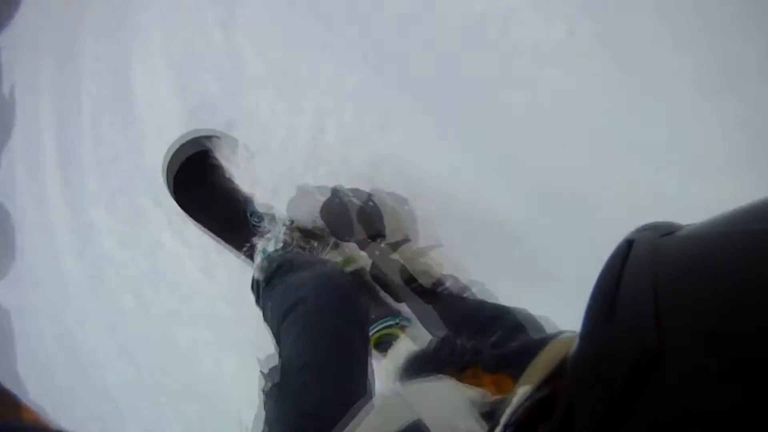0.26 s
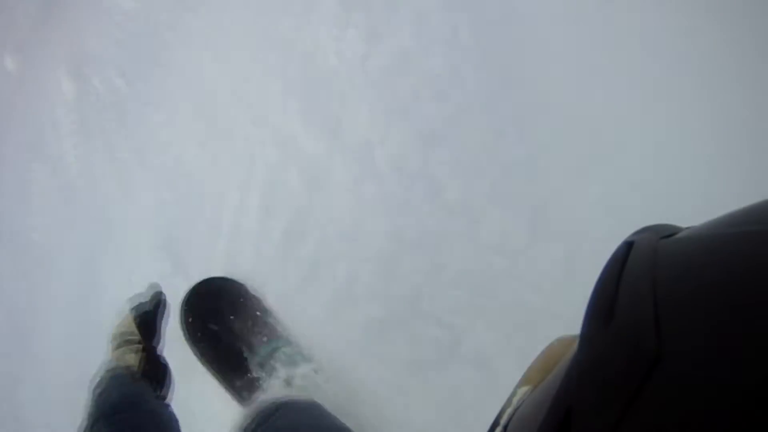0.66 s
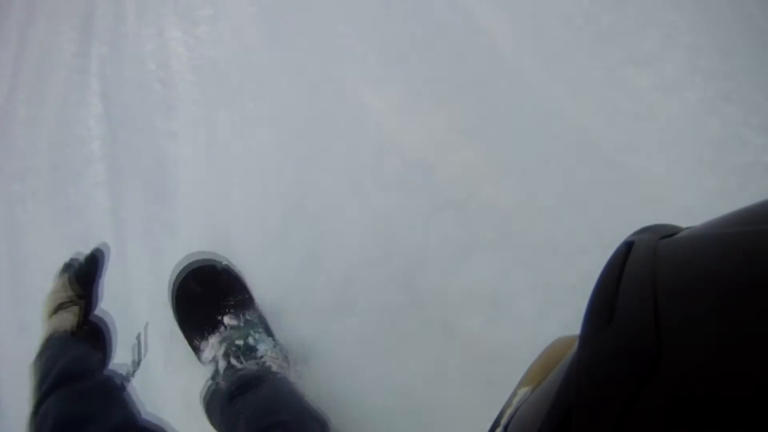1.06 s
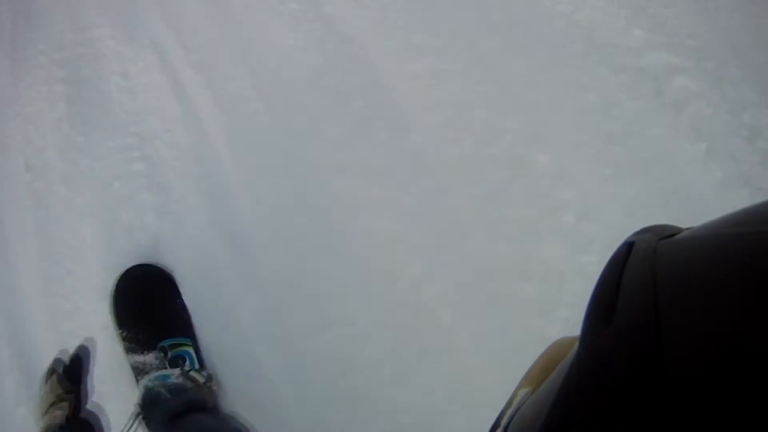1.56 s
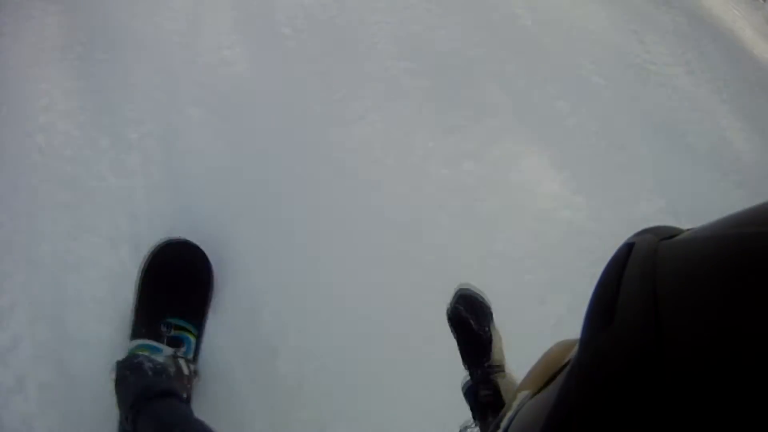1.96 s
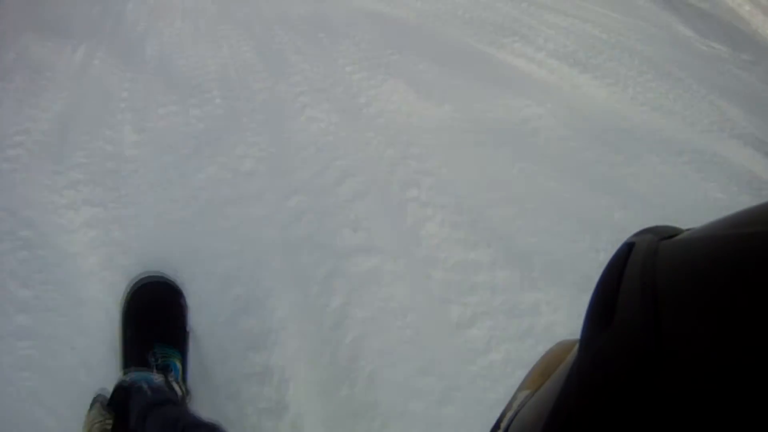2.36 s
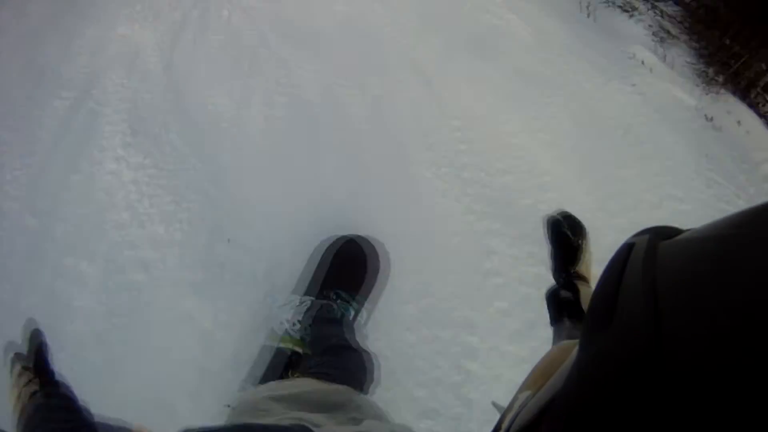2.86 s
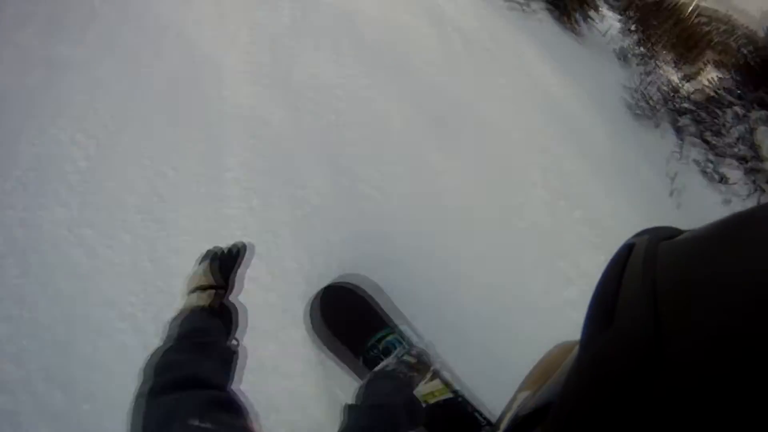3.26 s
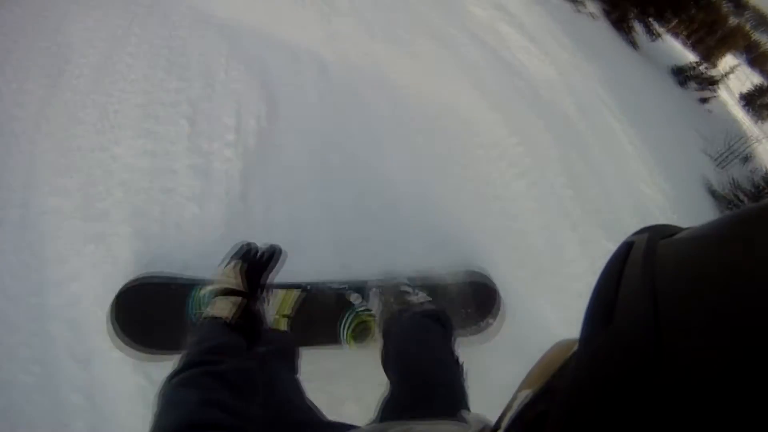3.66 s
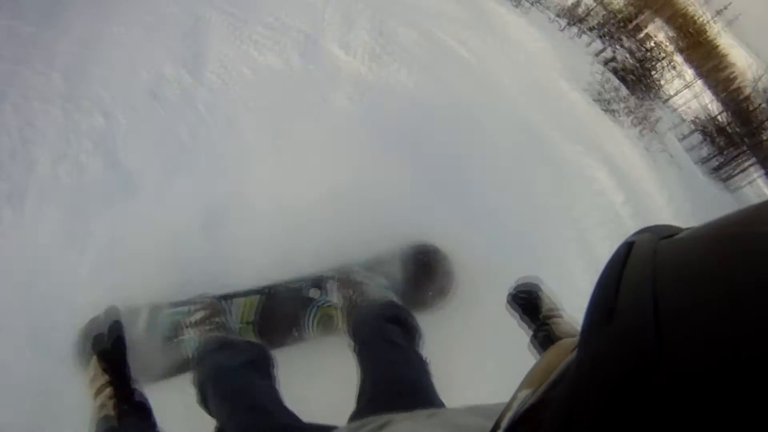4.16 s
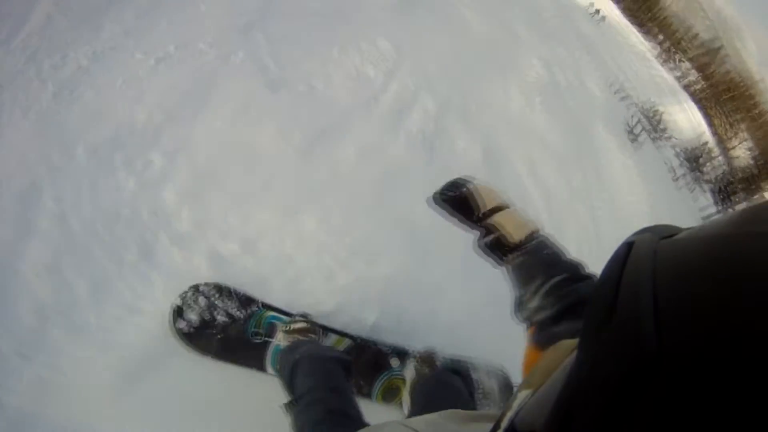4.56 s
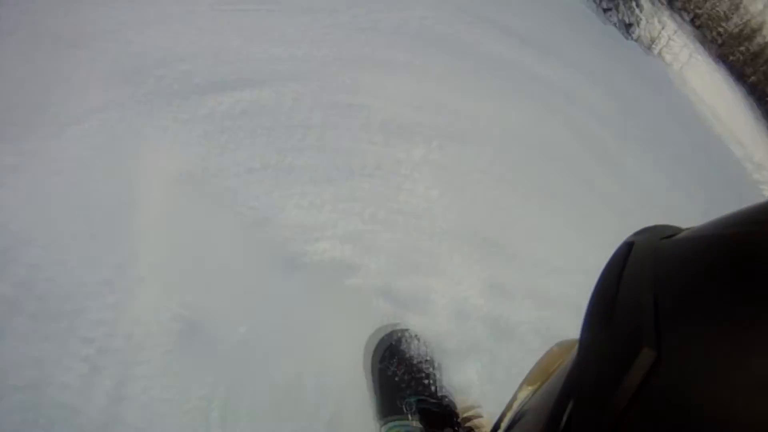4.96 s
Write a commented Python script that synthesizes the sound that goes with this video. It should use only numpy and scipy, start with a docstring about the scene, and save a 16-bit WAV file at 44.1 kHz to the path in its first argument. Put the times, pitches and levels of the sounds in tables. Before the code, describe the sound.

A snowboard scrapes and hisses over packed snow in buffeting low wind, after an opening burst of spray that overloads the microphone.

```python
"""A snowboard scrapes over packed snow in buffeting wind, heard from a small camera worn by the rider. At once
a burst of spray overloads the microphone; crumbs of ice tick on the case throughout, and now and then a sharp
tap clicks on it. Snow, wind and rumble are filtered noise; bumps, ice and the singing edge excite resonances.
The camera adds faint electrical buzz and burrs, and a glassy treble from coarse sampling."""
import sys
import numpy as np
from scipy import signal
from scipy.fft import rfft, irfft
from scipy.io import wavfile
from scipy.ndimage import uniform_filter1d

SR = 44100
rng = np.random.default_rng(int(sys.argv[2]) if len(sys.argv) > 2 else 0)


def wrap_up_sound(samples):
    """Save the sound to the file named by the first command line argument, as 16-bit audio."""
    columns = np.atleast_2d(samples).T
    # keep every value between -1 and 1, then stretch to whole-number steps
    tamed = np.clip(columns, -1, 1)
    steps = np.round(tamed * 32767).astype(np.int16)
    wavfile.write(sys.argv[1], SR, steps)


N = 229663
TIME = np.arange(N) / SR
USUAL_SCRAPE_DB = -34

# How far the board is turned sideways. Each row: time in seconds, skid share 0-1.
SKID_SHARE = [(0, 0.7), (1.4, 0), (1.75, 0.86), (2.3, 0.36), (2.8, 0), (3.15, 0.78), (3.8, 0.74), (4.3, 0),
              (4.7, 1), (5.21, 1)]


def amp(db):
    """Decibels to gain."""
    return 10 ** (np.asarray(db) / 20)


def unit(x):
    """Scales to rms 1."""
    return x / np.sqrt(np.mean(x ** 2) + 1e-20)


def curve(rows):
    """Joins rows (seconds, value) by straight lines."""
    return np.interp(TIME, *np.transpose(rows))


def add(mix, start_s, sound):
    """Mixes a sound in place, cut at the end of the mix."""
    part = mix[max(round(start_s * SR), 0):][:len(sound)]
    part += sound[:len(part)]


def swell(middle_s, length_s):
    """A smooth rise and fall of height 1."""
    return np.cos(np.pi * np.clip((TIME - middle_s) / length_s, -.5, .5)) ** 2


def wander(rate_hz):
    """Smooth random curve of rms 1 that changes about rate_hz times a second."""
    width = max(int(SR / rate_hz), 1)
    smooth = uniform_filter1d(rng.standard_normal(N), width, mode="wrap")
    return unit(uniform_filter1d(smooth, width // 2 + 1, mode="wrap"))


def coloured(x, colour):
    """Filters by a spectrum of (Hz, dB) rows, joined over log frequency; rms 1."""
    hz, db = np.transpose(colour)
    bins_hz = np.fft.rfftfreq(2 ** 18, 1 / SR)
    gain = amp(np.interp(np.log(bins_hz + 1), np.log(hz), db))
    return unit(irfft(rfft(x, 2 * len(bins_hz) - 2) * gain)[:N])


def resonate(x, hz, width_hz):
    """A resonance of gain 1 at a fixed or moving pitch: shift down to zero, smooth, shift back."""
    turn = np.exp(2j * np.pi * np.cumsum(hz * np.ones(len(x))) / SR)
    r = np.exp(-np.pi * width_hz / SR)
    smooth = signal.lfilter([(1 - r) ** 2], [1, -2 * r, r * r], x / turn)
    return 2 * (turn * smooth).real


def struck(modes, t):
    """Dying modes, neighbours of opposite sign, detuned a little for each blow; peak 1."""
    ring = np.zeros(len(t))
    for k, (hz, db, t60_s) in enumerate(modes):
        detuned_hz = hz * (1 + 0.013 * rng.standard_normal())
        ring += (-1) ** k * amp(db - 60 * t / t60_s) * np.sin(2 * np.pi * detuned_hz * t)
    return ring / abs(ring).max()


def spike(since_s, rise_s, fall_s):
    """An electrical spike: two exponentials subtracted; points down if rise_s exceeds fall_s."""
    return np.exp(-since_s / fall_s) - np.exp(-since_s / rise_s)


def crunch(per_s, spread_db, smooth):
    """Snow grains break one by one, a few of them large, over a smooth hiss of powder."""
    sizes = amp(spread_db * np.minimum(rng.exponential(1, N), 5))
    breaks = rng.random(N) < per_s / SR
    grains = rng.choice([-1, 1], N) * sizes * breaks
    return unit(grains) + smooth * rng.standard_normal(N)


def patchy(x, depth_db, order=5):
    """Patches of harder and softer snow lift and sink parts of the spectrum for hundredths of a second."""
    z = signal.stft(x, nperseg=512, noverlap=384)[2]
    across_hz = uniform_filter1d(rng.standard_normal(z.shape), order, axis=0)
    patches = unit(uniform_filter1d(across_hz, 2 * order, axis=1))
    return unit(signal.istft(z * amp(depth_db * patches), nperseg=512, noverlap=384)[1][:N])


def scrape_db():
    """Level of the scrape: the rider's weight on the board, and brief bites of the edge."""
    # How hard the base presses on the snow. Each row: time in seconds, level in dB.
    press = [(0, -40.5), (.11, -24), (.23, -44), (.29, -28.5), (.82, -35.5), (1.35, -33.5), (1.7, -40),
             (1.94, -45.5), (2.22, -41.5), (2.5, -38), (2.7, -35), (2.92, -36.5), (3.15, -32.5),
             (4.12, -52.5), (4.59, -55), (4.67, -39), (5.06, -33.5), (5.21, -50)]
    # The edge digs in. Each row: middle in seconds, extra level in dB.
    bites = [(1.3, 1.5), (1.41, 3.5), (1.61, 3), (1.75, 6), (2.058, 7), (3.79, 3.5)]
    bite_s = 0.0774
    return curve(press) + sum(db * swell(s, bite_s) for s, db in bites)


def fizz_db():
    """The fizz grows with the scrape, fades as the board turns sideways and drops past the icy patch."""
    usual_fizz_db, db_per_scrape_db, full_skid_db = -44.5, 0.402, -7.5
    crust_end_s, crust_fade_s, soft_snow_db = 1.355, 0.083, -4
    soft = np.clip((TIME - crust_end_s) / crust_fade_s, 0, 1)
    follow_db = db_per_scrape_db * (scrape_db() - USUAL_SCRAPE_DB)
    return usual_fizz_db + follow_db + full_skid_db * curve(SKID_SHARE) ** 3 + soft_snow_db * soft


def wind_db():
    """Level of the wind: the steady stream and its gusts."""
    # Steady air on the housing. Each row: time in seconds, level in dB.
    stream = [(0, -22.5), (.35, -23), (.8, -28), (1.75, -31), (2.25, -34.5), (2.7, -31), (2.95, -33),
              (3.17, -23), (3.46, -31.5), (3.9, -25.5), (4.22, -40), (4.75, -32), (5.21, -37.5)]
    # Each row: middle in seconds, length in seconds, extra level in dB.
    gusts = [(1.333, 0.23, 10.5), (2.423, 0.073, 3.5), (3.34, 0.175, 10.5), (3.573, 0.098, 5),
             (3.883, 0.095, 3.5)]
    return curve(stream) + sum(db * swell(s, length_s) for s, length_s, db in gusts)


def buzz(frame_hz=59.94):
    """The camera's electronics leak in: a spike up and one down on every picture frame, and a faint whine."""
    up = amp(-28.5) * spike((TIME - .0014) % (1 / frame_hz), rise_s=0.000138, fall_s=0.000626)
    down = amp(-23) * spike((TIME - .004) % (1 / frame_hz), rise_s=0.00044, fall_s=0.00121)
    whine = amp(-60.5) * unit(resonate(rng.standard_normal(N), hz=2672.0, width_hz=170))
    return up - down - np.mean(up - down) + whine


def burrs(pitch_hz=328, jitter=0.035):
    """Electrical burrs of a few uneven spikes, one due every one to three ticks of a steady clock."""
    first_s, tick_s, share_per_tick = .036, .05, .58
    level_db, spread_db = -37, 1.2
    out, t, due = np.zeros(N), np.arange(int(0.018 * SR)) / SR, 0
    for s in np.arange(first_s, N / SR, tick_s):
        due = due % 1 + share_per_tick * rng.uniform(.6, 1.4)
        period_s = 1 / (pitch_hz * rng.uniform(0.9513, 1.04))
        starts_s = period_s * (np.arange(8) + jitter * rng.standard_normal(8))
        since_s = np.maximum(t[:, None] - starts_s, 0)
        train = spike(since_s, rise_s=0.000328, fall_s=0.000257).sum(axis=1)
        train = (train - train.mean()) / train.std()
        gain = amp(level_db + spread_db * rng.standard_normal()) * (due >= 1)
        add(out, s - t[-1] / 2, gain * train * signal.windows.tukey(len(t), .6))
    return out


def wind():
    """Eddies push slowly on the housing: low noise, evened out, then driven by the wind level."""
    # Each row: frequency in Hz, gain in dB.
    wind_colour = [(8, -18.5), (22, -2), (40, 2), (55, -6), (75, -19), (120, -18), (200, -41), (400, -71.5),
                   (1000, -59.5)]
    flutter_db = 3
    eddies = coloured(rng.standard_normal(N), wind_colour)
    strength = np.sqrt(abs(uniform_filter1d(eddies ** 2, int(.09 * SR))) + 0.065)
    return eddies / strength * amp(wind_db() + flutter_db * wander(rate_hz=18.7) + 1.5)


def burst(start_s, end_s):
    """Snow lands at once, holds and stops dead."""
    attack_s, release_db_per_s = 0.0012, 3397.5
    attack = np.clip((TIME - start_s) / attack_s, 0, 1)
    return attack * amp(-release_db_per_s * np.maximum(TIME - end_s, 0))


def spray():
    """Fine dust builds up, then clumps of snow rattle on the housing and its ring turns from dull to bright."""
    # Each row: frequency in Hz, gain in dB.
    spray_colour = [(40, 8), (110, 2.5), (200, -4.5), (380, -4.5), (600, -16), (1000, -1.5), (1400, 1.5),
                    (2000, -1), (2500, -0.5), (2900, -5), (3600, -10), (4300, -3), (6000, -26)]
    # Heavy clumps. Each row: start in seconds, length in seconds, level in dB.
    heavy = [(0.1305, 0.0055, 3.5), (0.145, 0.0134, 6.5), (0.159, 0.0255, -1.5), (0.189, 0.00544, -6.5)]
    dust_start_s, dust_end_s = 0.069, 0.138
    dust_end_db, dust_rise_db_per_s = -9, 317.5
    dust_db = dust_end_db - dust_rise_db_per_s * np.maximum(dust_end_s - TIME, 0)
    dust = amp(dust_db) * burst(dust_start_s, dust_end_s)
    clumps = sum(amp(db) * burst(s, s + length_s) for s, length_s, db in heavy)
    grains = crunch(per_s=1500, spread_db=2.0, smooth=0.536) * amp(1.1 * wander(rate_hz=460))
    bright = np.interp(TIME, [.15, .175], [0, 1])
    dull_ring = amp(-10.5) * unit(resonate(grains, hz=2071, width_hz=610))
    bright_ring = amp(-6.5) * unit(resonate(grains, hz=3515.0, width_hz=327))
    rattle = patchy(coloured(grains, spray_colour), depth_db=4.0)
    return (rattle + (1 - bright) * dull_ring + bright * bright_ring) * np.maximum(dust, clumps)


def taps():
    """A sharp tap gives one hard click on the case."""
    # Each row: start in seconds, peak level in dB.
    hits = [(0.017, -27), (.038, -29), (.06, -17), (0.094, -4.5), (.234, -25.5), (0.2792, -9.5),
            (.33, -15.5), (.545, -13.5), (1.282, -19), (1.2997, -16.5), (1.4073, -11.5), (3.379, -21.5),
            (3.707, -22), (3.763, -26), (3.809, -25.5)]
    # Ring of the case. Each row: frequency in Hz, relative level in dB, t60 in seconds.
    case_modes = [(1507, 7.5, 0.0124), (1858, 2.5, 0.0453), (2229, 11, 0.008), (3620, 1.5, 0.0061),
                  (4570, -0.5, 0.00284)]
    out, t = np.zeros(N), np.arange(SR // 20) / SR
    for s, db in hits:
        add(out, s, amp(db) * struck(case_modes, t))
    return out


def crumb(db, ring_hz, crumbling_s):
    """A crumb shatters on the case in a few milliseconds and rings it."""
    body_db = -2  # against the ring
    t = np.arange(SR // 20) / SR
    age = t / max(crumbling_s, .0003)
    shatter = rng.laplace(size=len(t)) * np.sqrt(age) * np.exp(-1.3 * age)
    ring = resonate(shatter, ring_hz, width_hz=1060.0)
    ring = ring + amp(-5.5) * resonate(shatter, hz=4872, width_hz=580.0)
    body = resonate(shatter, hz=1946, width_hz=1550)
    return amp(db - 17.0) * (unit(ring) + amp(body_db) * unit(body))


def crumbs(count=60):
    """Large crumbs of ice, among random small ones: more with a harder scrape, as strong as the fizz."""
    # Each row: start in seconds, nominal peak in dB, ring in Hz, crumbling time in seconds.
    large = [(.315, -26.5, 3700, .0035), (0.3643, -25, 4720, 0.00256), (.4925, -24.5, 3810, 0.0048),
             (.6193, -22.5, 3610, 0.0062), (.775, -25.5, 3310, 0.002), (.9979, -31, 3655, 0.0034),
             (1.3578, -28, 3380, 0.0027), (1.393, -18.5, 3670, 0.0045), (1.4357, -21, 3600, 0.0044),
             (1.742, -34.5, 3740, .004), (1.7842, -32.5, 3280, 0.0022), (1.9505, -29.5, 3320, 0.00197),
             (2.083, -35.5, 3530, 0.0038), (2.1072, -36.5, 4980, 0.0021), (2.1894, -28.5, 4800, 0.00254),
             (2.2544, -29.5, 4190, 0.004), (2.443, -36, 3650, 0.0036), (2.656, -28, 4900, .0025),
             (2.8148, -32.5, 5300, 0.0026), (2.8742, -36, 3680, 0.0019), (2.9616, -24.5, 3660, 0.0094),
             (2.9911, -29, 4090, 0.0065), (3.1705, -33.5, 3530, 0.0035), (3.2472, -29.5, 3600, 0.00173),
             (3.2733, -28, 3460, 0.00166), (3.5561, -36.5, 3470, .0024), (3.829, -32.5, 4880, 0.00164),
             (3.8914, -33.5, 3700, 0.00375), (4.6912, -28.5, 3520, 0.0029)]
    usual_per_s, over_fizz_db, spread_db = 7.7, 9.5, -0.5
    small_hz, small_crumbling_s = 3740, 0.0024
    out, edge_db = np.zeros(N), fizz_db()
    per_s = usual_per_s * np.sqrt(amp(scrape_db() - USUAL_SCRAPE_DB))
    for s, db, ring_hz, crumbling_s in large:
        add(out, s, crumb(db, ring_hz, crumbling_s))
    for place, chance, size, tone in rng.random((count, 4)):
        i = int(place * N)
        db = edge_db[i] + over_fizz_db + spread_db * (2 * size - 1)
        small = crumb(db, small_hz * (1 + 0.467 * (tone - .5)), small_crumbling_s)
        flies = chance < per_s[i] * N / SR / count
        add(out, place * N / SR, small * flies)
    return out


def knocks():
    """Each bump gives a low thud, the deeper the longer, and a short hollow clack."""
    # Each row: start in seconds, thud level before decay in dB, thud in Hz, clack peak in dB.
    bumps = [(0.095, -3, 25.1, -9.5), (0.132, 4.5, 90.9, -28.5), (0.271, -13, 105.4, -7.5),
             (0.543, -34.5, 120, -14.5), (0.615, -13.5, 90.3, -16), (2.278, -4, 230, -10.5),
             (3.088, -10, 159, -42.5), (3.255, -14, 115, -37.5), (3.339, -3.5, 45.7, -2.5),
             (3.378, -26, 90, -17.5), (3.445, -42.5, 120, -18.5), (3.707, -24.5, 97.6, -28)]
    # Ring of board and housing. Each row: frequency in Hz, relative level in dB, t60 in seconds.
    clack_modes = [(191, 4, 0.0173), (344, -6, 0.0054), (632.7, -10.5, 0.0362), (1016, -1, 0.0317),
                   (1224.5, 1.5, 0.0119), (1721, -7.5, 0.017), (2215, -7, 0.0105), (3450, -21.5, 0.012)]
    thud_rise_s, thud_cycles = 0.00081, 7.85  # swings until 60 dB down
    out, t = np.zeros(N), np.arange(SR // 4) / SR
    for s, thud_db, thud_hz, clack_db in bumps:
        decay = amp(thud_db - 60 * t * thud_hz / thud_cycles)
        thud = -decay * np.sin(2 * np.pi * thud_hz * t) * (1 - np.exp(-t / thud_rise_s))
        ring = struck(clack_modes, t) * (1 - np.exp(-t / 0.00063))  # snow cushions the blow
        add(out, s, thud + amp(clack_db) * ring / abs(ring).max())
    return out


def chirps():
    """The edge bites and the board sings: stick and slip, as noise, feeds one narrow gliding resonance."""
    # Each row: start in seconds, length in seconds, start pitch in Hz, end pitch in Hz, level in dB.
    songs = [(1.28, 0.0857, 1034, 1076, -34.5), (1.562, 0.1115, 1067, 1134, -39.5),
             (1.711, 0.065, 1210, 1188, -36), (2.172, 0.054, 1077, 1143, -37.5),
             (3.105, 0.0667, 1577, 1690, -34.5), (3.196, 0.0352, 1620, 1580, -33.5),
             (3.485, 0.107, 1736, 1612, -40), (3.785, 0.032, 1988, 1790, -40.5),
             (4.791, 0.159, 1663, 1604, -40.5), (4.917, 0.335, 1069, 1130, -40),
             (4.941, 0.209, 2132, 1846, -38.5)]
    out = np.zeros(N)
    for s, length_s, start_hz, end_hz, db in songs:
        hz = np.linspace(start_hz, end_hz, int(length_s * SR))
        song = unit(resonate(rng.standard_normal(len(hz)), hz, width_hz=148.0))
        add(out, s, amp(db) * song * signal.windows.tukey(len(hz), .7))
    return out


def board():
    """Crunching snow shakes the board: glide blends into skid, the edge fizzes on crust, the board rumbles."""
    # Spectra of the four sounds. Each row: frequency in Hz, gain in dB.
    glide_colour = [(300, -16), (550, -14.5), (780, -13), (1000, -2.5), (1180, -4), (1550, -0.5),
                    (1850, -5), (2250, -1.5), (2600, -7), (3000, -14.5), (3600, -12), (4050, -30),
                    (6000, -60.5)]
    skid_colour = [(300, -8), (480, -10.5), (620, -4), (760, -7.5), (1100, -1), (1360, -5), (1620, -2.5),
                   (1850, -3.5), (2150, -4), (2500, -14.5), (3000, -26), (6000, -49)]
    fizz_colour = [(2000, -5), (3000, -11), (3350, -3), (3650, 5.5), (4000, -4.5), (4500, -6.5), (5000, -5),
                   (5500, -8), (6000, -27.5)]
    rumble_colour = [(40, 2.5), (90, 2.5), (160, -0.5), (250, 1.5), (400, -15.5), (700, -16.5), (1200, -20),
                     (3000, -32.5)]
    usual_rumble_db, usual_wind_db = -38.5, -30
    rumble_per_scrape, rumble_per_wind = 0.195, 0.418  # dB per dB
    skid = np.clip(curve(SKID_SHARE), 0, 1)
    grip = wander(rate_hz=47)  # the edge catches and lets go
    pressure_db = scrape_db() + 0.11 * wander(rate_hz=27)  # the snow is uneven

    glide = coloured(crunch(per_s=1100, spread_db=3.0, smooth=1.0), glide_colour)
    slide = coloured(crunch(per_s=1800, spread_db=2.0, smooth=0.9), skid_colour)
    scrape = patchy(np.sqrt(1 - skid) * glide + np.sqrt(skid) * slide, depth_db=1.6)
    scrape = scrape * amp(pressure_db + 1.02 * grip)

    fizz = patchy(coloured(crunch(per_s=580, spread_db=1.5, smooth=1.0), fizz_colour), depth_db=2.37)
    fizz = fizz * amp(fizz_db() + 0.68 * grip)

    rumble_db = usual_rumble_db + rumble_per_scrape * (pressure_db - USUAL_SCRAPE_DB)
    rumble_db = rumble_db + rumble_per_wind * (wind_db() - usual_wind_db)
    rumble = coloured(rng.standard_normal(N), rumble_colour) * amp(rumble_db + 3.05 * wander(rate_hz=44))
    return scrape + fizz + rumble


def scene():
    """Everything reaches one microphone inside the housing."""
    camera = buzz() + burrs()
    housing = wind() + spray() + taps() + crumbs()
    riding = knocks() + chirps() + board()
    return (camera + housing + riding)[None]


def record(dry):
    """A slow converter clips at full scale and holds each sample, which mirrors the sound into the treble."""
    converter_hz, edge_hz = 12000, 15400
    coarse = np.clip(signal.resample_poly(dry, converter_hz, SR, axis=1), -1, 1)
    held = signal.resample_poly(np.repeat(coarse, 4, axis=1), SR, 4 * converter_hz, axis=1)[:, :N]
    low_pass = signal.firwin(255, edge_hz, window=("kaiser", 8), fs=SR)
    return np.clip(signal.oaconvolve(held, low_pass[None], "same"), -1, 1)


dry = scene()
out = record(dry)
wrap_up_sound(out)
```